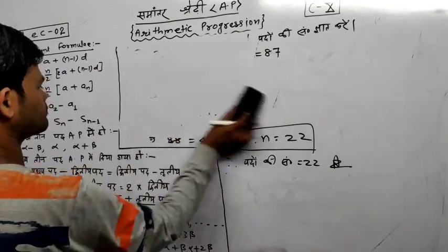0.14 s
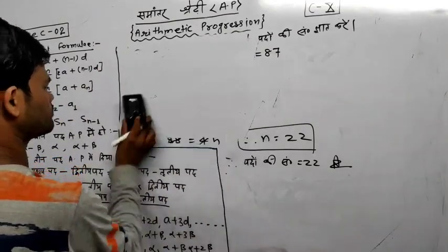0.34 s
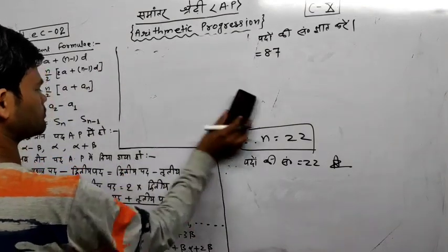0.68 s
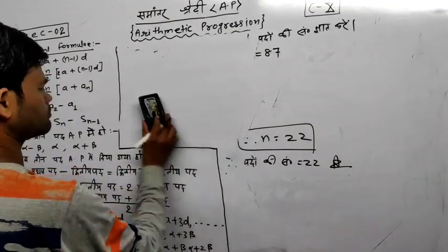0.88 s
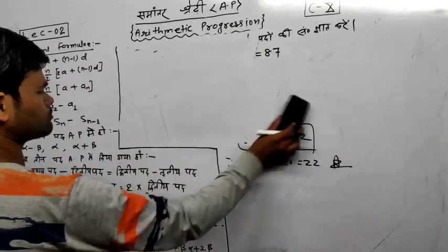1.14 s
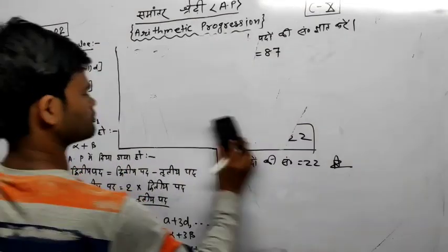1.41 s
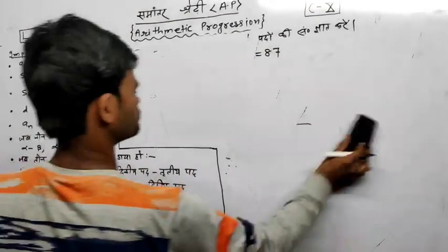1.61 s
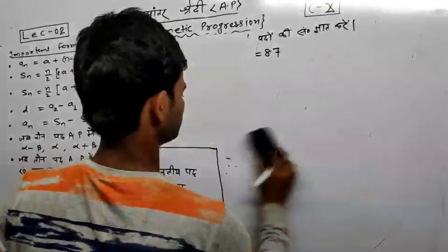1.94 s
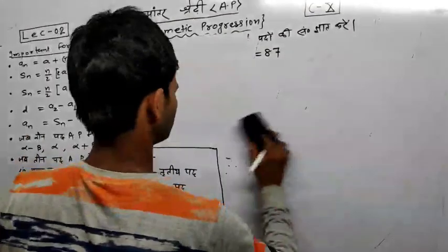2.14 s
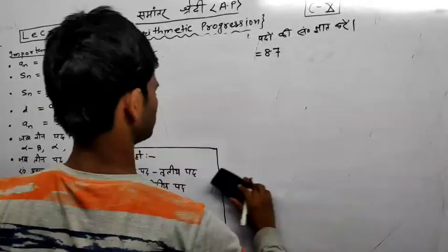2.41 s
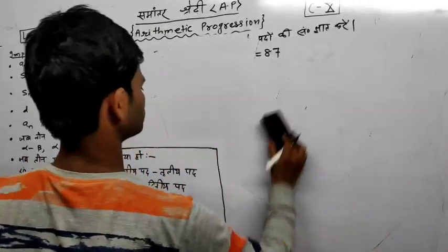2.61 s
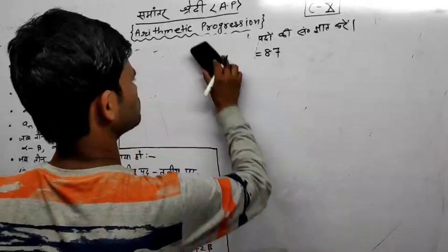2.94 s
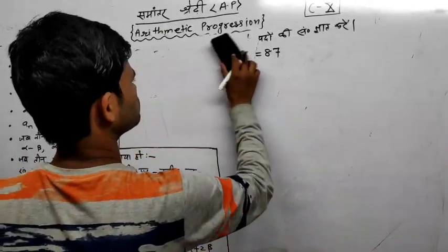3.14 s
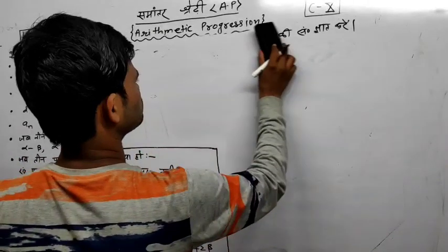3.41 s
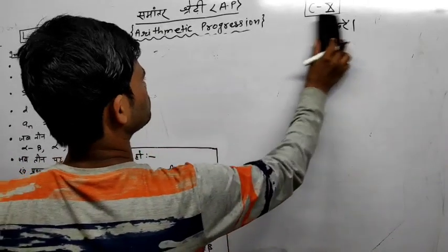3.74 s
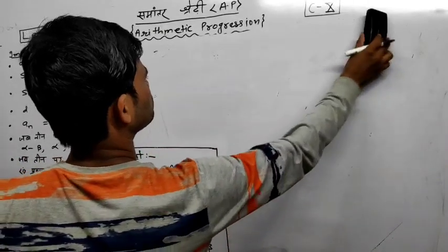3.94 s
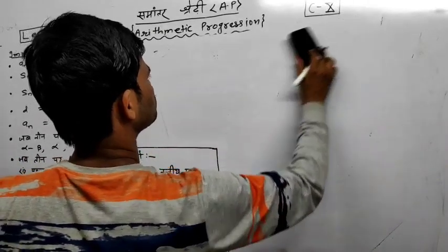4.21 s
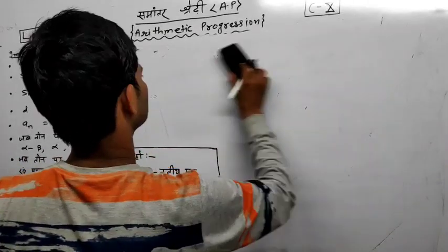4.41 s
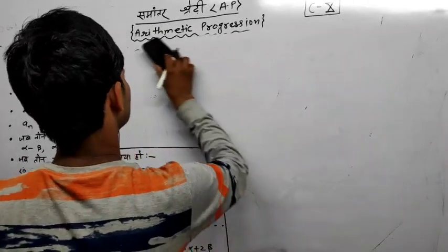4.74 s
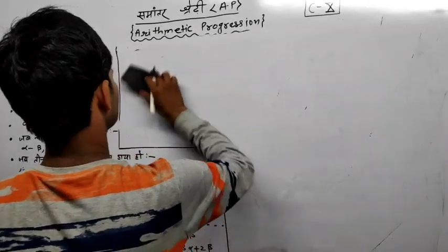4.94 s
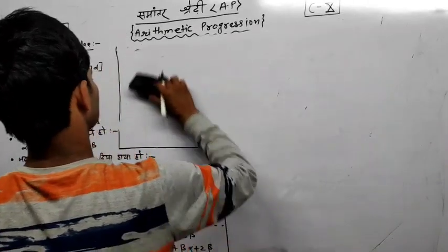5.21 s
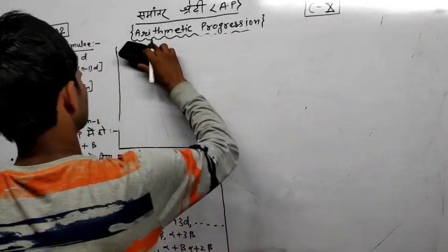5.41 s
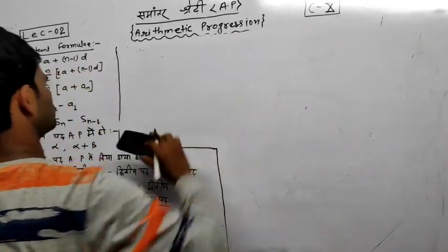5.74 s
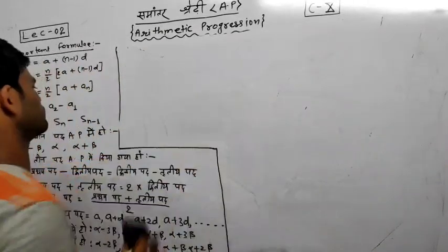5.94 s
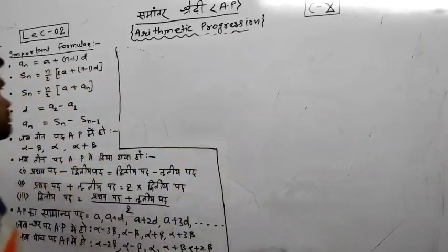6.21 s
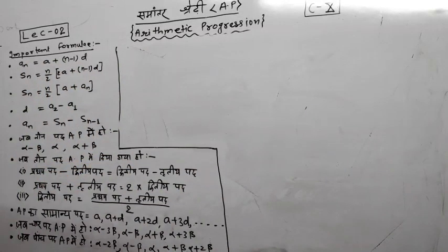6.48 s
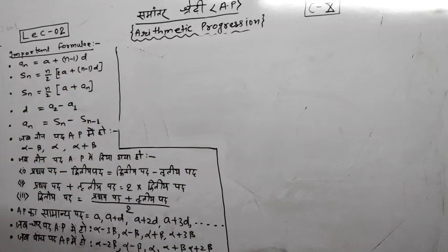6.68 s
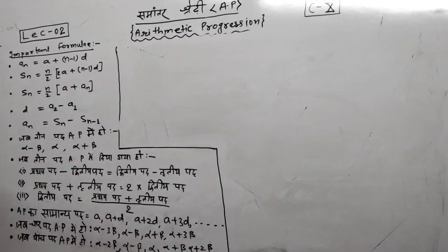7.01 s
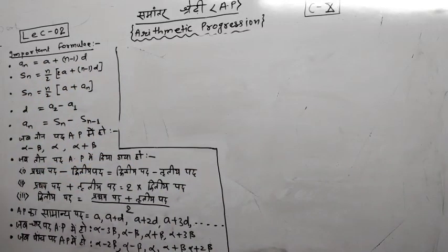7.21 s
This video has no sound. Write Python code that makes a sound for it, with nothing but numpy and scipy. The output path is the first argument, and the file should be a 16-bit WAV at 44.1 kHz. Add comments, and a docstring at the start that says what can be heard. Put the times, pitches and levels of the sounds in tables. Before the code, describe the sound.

Quick dry wiping strokes on a hard board, gradually softening, end in a few taps and gritty footsteps, above constant low humming.

```python
"""A small classroom, with a phone on a stand two metres from a whiteboard.
A felt duster sweeps to and fro: hiss follows the hand speed, the board body rasps and modes ring to knocks.
Then the duster lifts and feet scuff over the floor, with a faint narrow rustle: noise under drawn swells.
A motor hums at one low note, as wavering sines, over fan noise and a low rumble of filtered noise.
The two microphone ports colour the treble differently."""
import sys
import numpy as np
from scipy import signal
from scipy.fft import rfft, irfft, next_fast_len
from scipy.io import wavfile
from scipy.ndimage import uniform_filter1d

SR = 44100
rng = np.random.default_rng(int(sys.argv[2]) if len(sys.argv) > 2 else 0)


def master(y):
    """Save y as 16-bit WAV."""
    cut = np.clip(np.atleast_2d(y).T, -1, 1)
    pcm = np.round(cut * 32767)  # scale
    wavfile.write(sys.argv[1], SR, pcm.astype(np.int16))


N = 324223
FFT_SIZE = next_fast_len(N)
TIME = np.arange(N) / SR
FREQ = np.maximum(np.arange(FFT_SIZE // 2 + 1) * SR / FFT_SIZE, 1)

# Hiss spectrum of felt on the board: (frequency [Hz], relative density [dB per Hz])
FELT_SPECTRUM = [(880, -42), (1500, -28), (1830, -25), (2450, -17.5), (2750, -8.5), (3050, -8),
                 (3550, -9.5), (4000, -5), (5500, -3), (6800, -1), (7600, 0.5), (8500, 0.5), (14300, -1)]
# Hiss spectrum of soles on the floor: (frequency [Hz], relative density [dB per Hz])
SOLE_SPECTRUM = [(1200, -14.5), (1800, -16), (2500, -12.5), (4000, -7.5), (7700, 5), (11000, 3), (14300, 0)]
# Rasp spectrum of board and floor: (frequency [Hz], relative density [dB per Hz])
BODY_SPECTRUM = [(250, 3), (480, 3), (600, 4), (1000, -3.5), (2000, -4.5), (3200, -5), (6000, -27)]
# Duster strokes, each running to the next turn: (turn [s], hiss left at the turn [dB],
# fastest point [share of stroke 0-1], roundness [exponent, small = even speed], hiss at full speed [dB],
# top treble against the hiss at full speed [dB], lower hiss against its usual share [dB])
STROKES = [(-0.01, -44.5, 0.63, 1.7, -37, -3, -0.5), (0.239, -50.5, 0.36, 0.78, -37, -3.5, -1.5),
           (0.495, -64, 0.59, 0.85, -37.5, -4.5, 0.7), (0.775, -54, 0.56, 1.05, -38.5, -3, -1),
           (0.995, -52, 0.65, 0.64, -37, -4, 0.7), (1.285, -54, 0.6, 1, -37, -4.5, -0.5),
           (1.48, -43, 0.57, 0.91, -35.5, -2, 4.3), (1.76, -49.5, 0.56, 1.3, -34.5, -3.5, -2.5),
           (1.99, -45.5, 0.2, 1.7, -35, -2, 1.5), (2.155, -53.5, 0.6, 1.3, -40, -5, 1),
           (2.36, -43.5, 0.34, 1.6, -39.5, -8, 2.5), (2.525, -52.5, 0.36, 1.9, -39.5, -4.5, 1.5),
           (2.825, -50.5, 0.28, 2.5, -42.5, -1.5, 0.16), (3.08, -57, 0.52, 1.6, -48, -7, 8),
           (3.57, -53.5, 0.7, 1.34, -42, -5, 3.3), (4.063, -68.5, 0.49, 0.9, -39.5, -9.5, -4.2),
           (4.6, -42, 0.15, 3.3, -44.5, -8, 0.9), (4.95, -48.5, 0.53, 1.5, -42.5, -10, 0.42),
           (5.22, -61, 0.32, 1.23, -44, -11, -1), (5.52, -91, 0.68, 1.4, -37, -9, -4.5)]
# Drift of the upper rasp against its usual share: (time [s], level [dB])
UPPER_RASP_DRIFT = [(0.0, 7), (0.45, 2.5), (0.7, 5.5), (1.35, 4.5), (1.62, 9.5), (1.9, 6), (2.15, 4.5),
                    (2.38, 4.5), (2.85, 0), (3.25, 8), (3.7, 6), (4.3, 2), (4.75, 0.5), (5.0, 7.5),
                    (5.25, -1), (5.65, 6), (5.85, 0), (6.0, 4)]
# Harder scrapes: (start [s], attack [s], hold [s], release [s], level [dB],
# upper part against the whole [dB])
SCRAPES = [(0.05, 0.091, 0, .06, -55, 0), (1.982, 0.025, 0.062, 0.03, -47.5, -1),
           (2.56, 0.047, 0.0098, 0.054, -54.5, -17), (4.062, 0.045, .03, 0.11, -57.5, -30),
           (4.56, 0.027, 0.0017, 0.1, -54, -8), (4.805, 0.037, 0.029, 0.08, -55, -11),
           (5.57, 0.039, 0, 0.029, -50.5, -19), (5.762, 0.018, 0.013, 0.068, -52.5, -1),
           (6.486, 0.024, 0.0063, 0.05, -56, -2), (6.546, 0.044, .04, 0.088, -50.5, -3.5),
           (6.868, 0.014, 0.038, 0.054, -59, -19)]
# Motor lines: (frequency [Hz], mean level [dB rms])
HUM_LINES = [(64.6, -42.5), (807.5, -71.5), (907, -76.5)]
# Spectrum of fan noise and room hiss: (frequency [Hz], relative density [dB per Hz])
AIR_SPECTRUM = [(8.8, -38), (15, 6), (71, -5.5), (91, -11.5), (115, -21), (167, -13), (333, -19),
                (498, -25), (744, -29), (811, -25), (1050, -38), (3040, -47), (3500, -37.5), (7390, -32),
                (14300, -36.5)]
# Low room modes lifting the air noise: (frequency [Hz], width [Hz], lift [dB])
ROOM_MODES = [(83, 9.1, 6), (153.5, 33, 8.5), (185.5, 9.2, 1.5), (255, 14, 5.5), (302, 15, 3.5),
              (343.6, 42, 5.5)]
# Low rumble as it comes and goes: (time [s], level [dB])
RUMBLE_LEVEL = [(0.0, -58), (0.14, -43), (0.43, -50.5), (0.67, -48), (0.86, -56), (1.05, -46),
                (1.49, -55.5), (1.62, -45), (2.43, -57.5), (5.9, -56.5), (7.27, -54), (7.35, -55)]
# Knocks on the board: (time [s], level of the ring [dB peak], hardness [0-1])
KNOCKS = [(0.473, -31, 0.3), (.98, -29, 0.35), (0.9833, -41, 0.1), (1.005, -32, 0.44), (1.012, -38, .2),
          (1.647, -37, 0.8), (2.005, -36, .1), (4.6, -40, 0.3), (5.592, -29.5, .0), (5.7835, -30, 0.99),
          (5.7885, -35, 0.7), (5.794, -39, 0.9), (5.987, -36.5, 0.4), (6.881, -38, 0)]
# Board modes: (frequency [Hz], level at hardness 1 before its tilt [dB], 60 dB decay at hardness 0.5 [s])
BOARD_MODES = [(550, 1, 0.041), (683, 9.5, 0.02), (1020, 11, 0.026), (1345, 11, 0.03), (1800, 8.5, 0.022),
               (2400, 0, 0.016), (4500, -2, .01)]
# Feet on the floor: (start [s], attack [s], hold [s], release [s], level of the upper part [dB],
# lower part against it [dB])
SCUFFS = [(5.809, 0.026, 0.071, 0.068, -52.5, -7), (5.863, 0.078, 0.021, 0.039, -42.5, -10),
          (5.96, 0.032, 0.19, .08, -60, -7), (6.13, 0.037, 0.018, .06, -56.5, -20),
          (6.281, 0.054, 0.13, .04, -49, -8.5), (6.474, 0.021, 0.022, 0.029, -43, -12),
          (6.493, 0.041, 0.14, 0.087, -36, -10.5), (6.923, 0.012, 0.033, 0.084, -38.5, -10),
          (7.117, 0.017, 0.011, .03, -54, -10), (7.152, 0.018, 0.027, .02, -49.5, -21)]
# Faint rustles: (start [s], attack [s], hold [s], release [s], level [dB])
RUSTLES = [(5.975, .012, .02, .03, -62), (6.015, 0.028, 0.038, .09, -52)]
# Narrow resonances of the rustle: (frequency [Hz], width [Hz], relative level [dB])
RUSTLE_PEAKS = [(1450, 210, 2), (2060, 600, -6), (3160, 300, -5)]
# Likeness of diffuse sound at the two ports: (frequency [Hz], likeness [0-1])
PORT_LIKENESS = [(60, 0.91), (250, 0.93), (630, 0), (2500, 0), (4000, 0), (8000, 0.09)]
# Difference between the microphone ports: (frequency [Hz], left minus right [dB])
PORT_DIFFERENCE = [(300, 0), (3000, -.5), (5000, -2), (7600, -10), (9500, 0), (11500, 9.5), (14300, 10.5)]

LIFT_S, LIFT_DB = 5.81, -51  # the duster leaves the board; hiss at that moment
TURN_DULL_DB = -2.5  # change of top treble as the hand slows to a stop
# rasp near a hiss of -40 dB before drift; dB of rasp per dB of hiss; upper part against the whole
RASP_DB, RASP_SLOPE, RASP_TOP_DB = -60.5, 0.19, -1.5
AIR_DB = -44.5
CRACK_DB, CRACK_S = 4, .0016  # noise at hardness 1 before differencing; decay constant
ROOM_T60_S, ROOM_DB = .2, -11  # echo of the knocks: 60 dB decay; energy against the direct sound
WASH_T60_S, WASH_DB = 0.4, -16  # the same for steady rubbing
OFFSET = -.0007  # constant shift at the microphone, full scale = 1
TOP_HZ = 14280  # upper limit of the microphone


def undb(db):
    """Decibels to gain."""
    return 10 ** (np.asarray(db) / 20)


def over_hz(table):
    """A (frequency, value) table read at every frequency, on a log scale."""
    hz, value = np.transpose(table)
    return np.interp(np.log(FREQ), np.log(hz), value)


def over_time(table):
    """The columns of a curve read at every sample."""
    s, *columns = np.transpose(table)
    return [np.interp(TIME, s, column) for column in columns]


def colour(x, gain):
    """Weights every frequency, then brings the result to rms 1."""
    y = irfft(rfft(x, FFT_SIZE) * gain, FFT_SIZE)[..., :N]
    return y / np.sqrt(np.mean(y ** 2))


def walk(rate):
    """Random levels held 1 / rate seconds and smoothed twice; spread near 1."""
    k = int(SR / rate)
    held = np.repeat(rng.standard_normal(N // k + 1), k)
    return 1.14 * uniform_filter1d(uniform_filter1d(held, k), k)[:N]


def swell(start, attack, hold, release):
    """Rises, holds and falls away as a squared ramp; 0-1."""
    times = np.cumsum([start, max(attack, .005), max(hold, 0), max(release, .005)])
    return np.interp(TIME, times, [0, 1, 1, 0]) ** 2


def lingering(gain):
    """Level of a moving hiss with its decaying wash from the walls: powers add."""
    keep = 1000 ** (-2 / (WASH_T60_S * SR))
    wash = signal.lfilter([1 - keep], [1, -keep], gain ** 2)
    return np.sqrt(gain ** 2 + undb(WASH_DB) ** 2 * wash)


def resonance(hz, width):
    """A peak of height 1 around one frequency."""
    return 1 / (1 + (2 * (FREQ - hz) / width) ** 2)


def low_band(centre, width):
    """A band of noise weights around a low frequency; width is relative to the centre."""
    return 1 / (1 + ((FREQ / centre - centre / FREQ) / width) ** 4)


def diffuse(scatter_db):
    """Tiny slips of uneven size, much alike at both ports in the bass and nearly unrelated in the treble."""
    slip_size = undb(scatter_db * np.minimum(rng.exponential(size=N), 6))
    slips = rng.standard_normal((2, N)) * slip_size
    alike = np.clip(over_hz(PORT_LIKENESS), 0, 1)
    mid, side = rfft(slips, FFT_SIZE) * np.sqrt([1 + alike, 1 - alike])
    return irfft([mid + side, mid - side], FFT_SIZE)[:, :N]


def rubbing(spectrum, split_hz, scatter_db, patchy_db):
    """Friction hiss as a lower and an upper part; dusty and clean patches make each flicker."""
    upper = 1 / np.sqrt(1 + (split_hz / FREQ) ** 8)
    slips, gain = diffuse(scatter_db), undb(over_hz(spectrum))
    # part of the sound arrives straight, earlier at one port or the other as the source moves
    straight = colour(rng.standard_normal(N), 1 / (1 + (FREQ / 4500) ** 4))
    lag = np.array([[1], [-1]]) * 3.0 * walk(2.7)  # samples
    straight = np.interp(np.arange(N) + lag, np.arange(N), straight)
    slips = slips / slips.std() + 0.3 * straight
    shared = patchy_db * walk(40)
    low = colour(slips, gain * np.sqrt(1 - upper ** 2)) * undb(shared + patchy_db * walk(25.29))
    high = colour(slips, gain * upper) * undb(shared + patchy_db * walk(25))
    return low, high


def hand():
    """Hiss gain, top treble and lower hiss [dB]: the hand speeds up after each turn and slows into the next."""
    turn_s, turn_db, fastest, roundness, db, top_db, lower_db = np.transpose(STROKES)
    ends = np.append(turn_s, LIFT_S)
    k = np.clip(np.searchsorted(ends, TIME) - 1, 0, len(STROKES) - 1)  # stroke under way
    part = np.clip((TIME - ends[k]) / np.diff(ends)[k], 0, 1)
    peak = np.clip(fastest[k], .05, .95)
    nearness = np.minimum(part / peak, (1 - part) / (1 - peak))
    speed = np.sin(np.pi / 2 * nearness) ** roundness[k]

    slow = undb(np.interp(TIME, ends, np.append(turn_db, LIFT_DB)))
    lifted = np.clip((LIFT_S - TIME) / 0.012 + 1, 0, 1)  # falls to 0 in 12 ms
    hiss = (slow + (undb(db[k]) - slow) * speed) * lifted
    middles = turn_s + fastest * np.diff(ends)
    top = np.interp(TIME, middles, top_db) + TURN_DULL_DB * (1 - speed)
    return hiss, top, np.interp(TIME, middles, lower_db)


def duster():
    """Felt hiss follows the speed of the hand and stops when the duster lifts; the board thrums along."""
    gain, top_db, lower_db = hand()
    low, high = rubbing(FELT_SPECTRUM, split_hz=7800, scatter_db=1.5, patchy_db=1.12)
    lower = signal.sosfiltfilt(signal.butter(2, 5000, fs=SR, output="sos"), low)
    low = low + (undb(lower_db + 1.45 * walk(6.04)) - 1) * lower
    share = np.clip(undb(top_db), 0, .95)
    thrum = undb(-25.5) * colour(diffuse(0), low_band(330, 0.6))
    return lingering(gain) * (np.sqrt(1 - share ** 2) * low + share * high + thrum)


def steps():
    """Gains of the lower and upper part of all scuffs."""
    return sum(undb([[db + low_db], [db]]) * swell(*shape) for *shape, db, low_db in SCUFFS)


def split_power(top_db):
    """Gains of a lower and an upper part whose powers add to 1."""
    top_power = undb(2 * min(top_db, 0))
    return np.sqrt([[1 - top_power], [top_power]])


def rasp():
    """Coarser slips drive the body of board and floor, along with strokes, steps and harder scrapes."""
    low, high = rubbing(BODY_SPECTRUM, split_hz=1120, scatter_db=2.5, patchy_db=1.2)
    hiss = (hand()[0] + steps()[1]) / .01  # 1 = -40 dB
    # the lower part takes three tenths of the drift
    drift = undb(np.array([[.3], [1]]) * over_time(UPPER_RASP_DRIFT)[0])
    gain = undb(RASP_DB) * (hiss + 0.038) ** RASP_SLOPE * drift * split_power(RASP_TOP_DB)
    for *shape, db, top_db in SCRAPES:
        gain = gain + undb(db) * split_power(top_db) * swell(*shape)
    return lingering(gain[0]) * low + lingering(gain[1]) * high


def hum():
    """Motor lines that waver together in pitch and separately in strength."""
    drift = np.cumsum(1 + 0.002 * walk(3)) / SR  # wavering time [s]
    out = np.zeros(N)
    for hz, db in HUM_LINES:
        amplitude = np.sqrt(2) * undb(db + 0.24 * walk(2.99))
        out += amplitude * np.sin(2 * np.pi * hz * drift)
    return out


def air():
    """Fan noise and room hiss as shaped noise; the low modes of the room stand out."""
    modes_db = sum(db * resonance(hz, width) for hz, width, db in ROOM_MODES)
    noise = colour(diffuse(0), undb(over_hz(AIR_SPECTRUM) + modes_db))
    return undb(AIR_DB + .5 * walk(1.85)) * noise


def rumble():
    """A narrow band of low noise just above the hum; it comes and goes."""
    level_db = over_time(RUMBLE_LEVEL)[0] + 2.0 * walk(2.63)
    return undb(level_db) * colour(diffuse(0), low_band(95, .5))


def knocks():
    """A short push rings the board; a harder one reaches the higher modes, rings longer and cracks."""
    out, t = np.zeros((2, N)), np.arange(SR // 4) / SR
    noises = rng.standard_normal((len(KNOCKS), 2, len(t)))
    for (s, db, hard), noise in zip(KNOCKS, noises):
        ring = np.zeros(len(t))
        for hz, mode_db, t60 in BOARD_MODES:
            # soft knocks lose 9.5 dB per octave above 1 kHz, less as hardness grows
            level = undb(mode_db + 9.5 * (hard - 1) * np.log2(hz / 1000))
            decay = 1000 ** (-t / (t60 * (.5 + hard)))
            ring += level * np.sin(2 * np.pi * hz * t) * decay
        ring = ring / np.abs(ring).max() * np.minimum(t / 0.00079, 1)  # onset in 0.79 ms
        crack = hard ** 2 * np.gradient(noise, axis=1) * np.exp(-t / CRACK_S)
        start = int(s * SR)
        hit = (ring + undb(CRACK_DB) * crack)[:, :N - start]
        out[:, start:start + hit.shape[1]] += undb(db) * hit
    return out


def room(x):
    """Adds the scattered echo of the walls as decaying noise, different at each port."""
    t = np.arange(SR // 2) / SR
    tail = rng.standard_normal((2, len(t))) * 1000 ** (-t / ROOM_T60_S) * (t > .004)
    tail = tail * undb(ROOM_DB) / np.sqrt(np.sum(tail ** 2, axis=1, keepdims=True))
    return x + signal.fftconvolve(x, tail, axes=1)[:, :N]


def feet():
    """Soles drag over a gritty floor: friction hiss under a swell for each scuff."""
    low_gain, high_gain = steps()
    low, high = rubbing(SOLE_SPECTRUM, split_hz=3800, scatter_db=2.2, patchy_db=1.67)
    return lingering(low_gain) * low + lingering(high_gain) * high


def rustle():
    """Light rubbing that sounds in a few narrow resonances."""
    peaks = sum(undb(db) * resonance(hz, width) for hz, width, db in RUSTLE_PEAKS)
    gain = sum(undb(db) * swell(*shape) for *shape, db in RUSTLES)
    return lingering(gain) * colour(diffuse(2.5), peaks)


def scene():
    """Everything that reaches the phone."""
    background = hum() + air() + rumble()
    return duster() + rasp() + background + room(knocks()) + feet() + rustle()


def record(dry):
    """The right port is stronger near 7.6 kHz and duller above; the top is cut steeply."""
    tilt = undb(np.array([[.5], [-.5]]) * over_hz(PORT_DIFFERENCE))
    ports = irfft(rfft(dry, FFT_SIZE) * tilt, FFT_SIZE)[:, :N]
    top_cut = signal.ellip(16, .2, 80, TOP_HZ, fs=SR, output="sos")
    return signal.sosfilt(top_cut, ports + OFFSET)


dry = scene()
out = record(dry)
master(out)
```